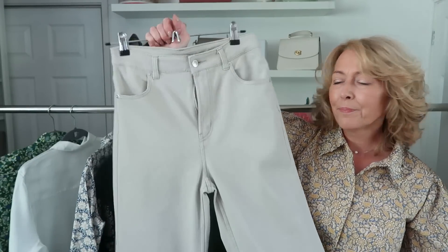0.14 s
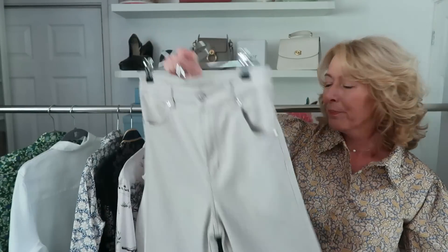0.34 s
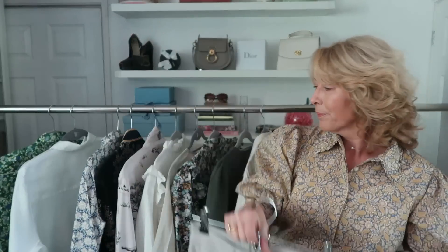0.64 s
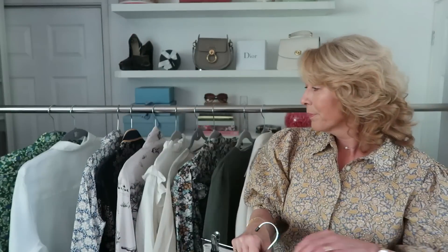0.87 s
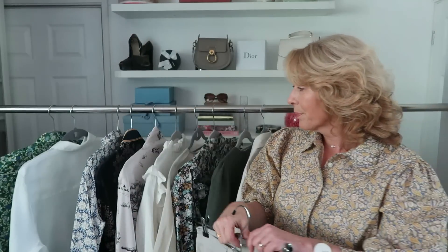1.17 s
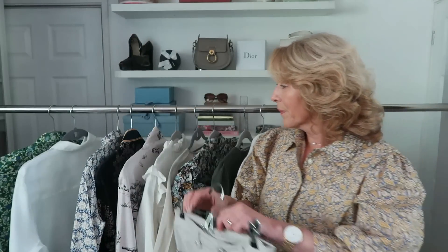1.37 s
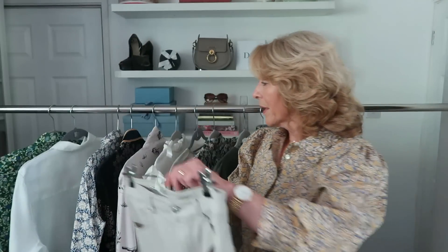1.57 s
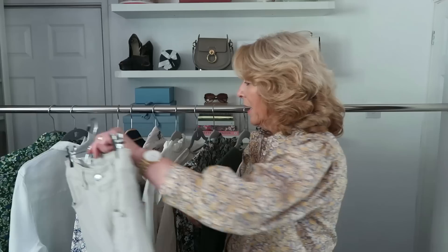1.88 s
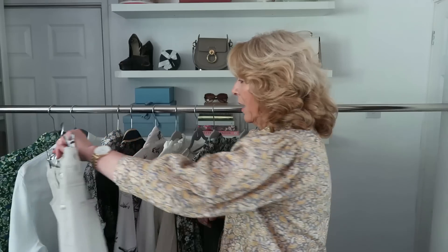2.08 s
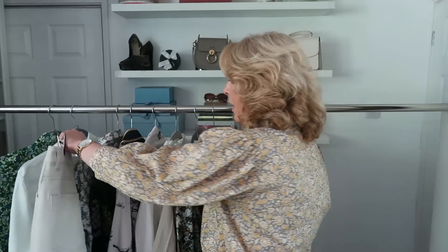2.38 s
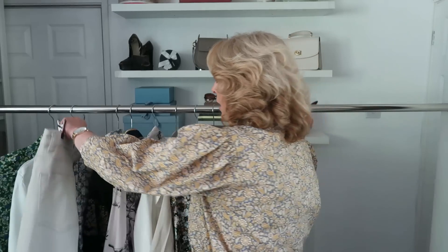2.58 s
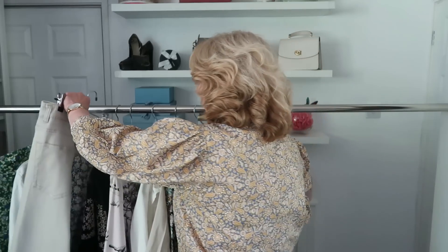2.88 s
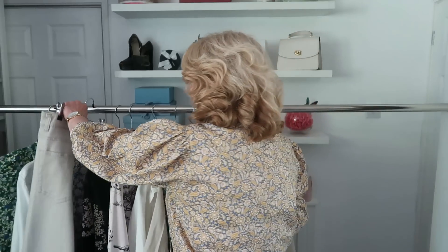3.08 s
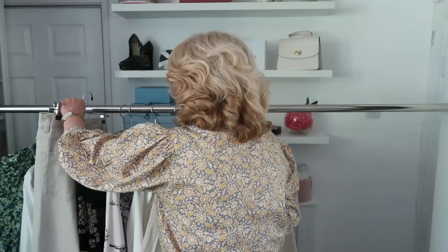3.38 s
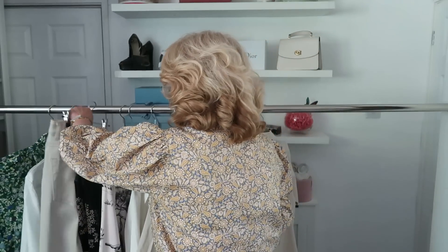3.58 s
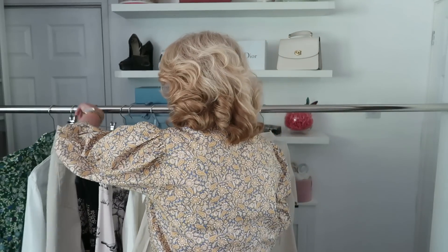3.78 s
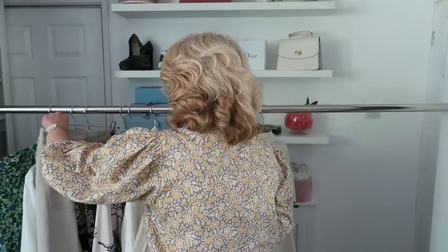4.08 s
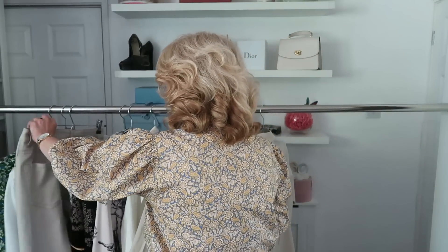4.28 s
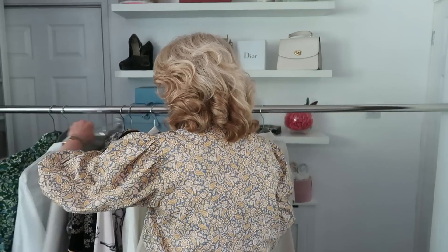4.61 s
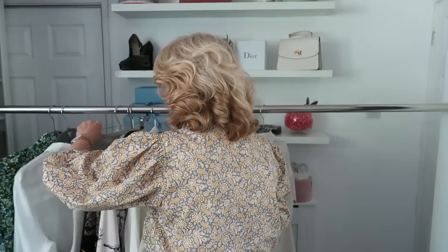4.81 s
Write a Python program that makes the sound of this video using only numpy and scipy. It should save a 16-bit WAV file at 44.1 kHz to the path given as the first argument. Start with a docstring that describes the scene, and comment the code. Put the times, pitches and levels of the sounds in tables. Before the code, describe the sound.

A small, fairly dry room with soft steady air noise, a faint low hum and a barely perceptible high whine, heard by a close stereo pair. From 0.4 s a floorboard gives quiet, short hollow creaks, recurring until about 2.2 s. A dull, muffled thud lands at 0.9 s, and a firmer woody knock at 1.36 s. A sharp clip snap at 1.57 s leads into quick lighter clicks until 1.75 s, with a brief rustle of cloth around 1.7 s. Low bumps and a click come at 2.3-2.5 s. At 2.87 s a hook strikes the steel rail: the strongest metallic clank, briefly ringing. Small clicks follow at 3.27-3.43 s, then a brighter clink at 3.73 s, with more faint creaks from 3.2 to 3.85 s. Light ticks at 3.96, 4.12 and 4.44 s accompany faint scraping slides near 4.3, 4.63 and 4.77 s, with a click and soft thuds from 4.7 s.

```python
"""In a small quiet room a garment on a clip hanger is lowered, knocked about and hooked on a steel rail.
A floorboard creaks first, as short damped notes; then furniture thuds, as dull noise and body modes.
Clips tick as short noise bursts, and cloth rustles as clumped noise grains.
Hooks strike the rail and set its modes ringing, then slide along it as random slips; a last thud follows.
Throughout, air noise, a hum and a whine lie beneath; a close pair of microphones hears it all."""
import sys
import numpy as np
from scipy import signal
from scipy.fft import rfft, irfft
from scipy.io import wavfile
from scipy.ndimage import uniform_filter1d

SR = 44100
rng = np.random.default_rng(int(sys.argv[2]) if len(sys.argv) > 2 else 0)


def wav_out(sig):
    """Save sig, one row per channel (or a flat mono array), as 16-bit PCM at SR to the path in sys.argv[1]."""
    wavfile.write(sys.argv[1], SR, np.round(np.clip(np.atleast_2d(sig).T, -1, 1) * 32767).astype(np.int16))


def gain_from_db(level_db):
    """Turn a decibel level (scalar or array-like) into a linear amplitude factor."""
    decades = np.asarray(level_db, float) / 20
    return 10 ** decades


N = 218198  # length [samples]

# modes of hooks and hangers on the rail: (frequency [Hz], relative level [dB], t60 when struck [s])
RAIL_MODES = [(502.6, 5, 0.091), (644.5, -6.5, 0.23), (761, -8, 0.17), (821, 0.5, 0.13), (950, -6, 0.15),
              (1134, -1.5, 0.15), (1343, -2.5, 0.12), (1686, -3.5, 0.17), (1895, -5, 0.12),
              (2146.5, 2.5, 0.18), (2517, -3, 0.28), (2748, 5, 0.093), (2841, 3, 0.18), (2920, -11, 0.16),
              (3180, -19, 0.17), (3440, -2.5, .12), (4238, 7.5, 0.055), (4960, 21.5, 0.025),
              (5180, 24, 0.016), (5367, -19, 0.32), (7540, 14.5, 0.05)]
# long thin ring of the rail tube itself: (frequency [Hz], relative level [dB], t60 when struck [s])
TUBE_MODES = [(2544, -12.5, 0.54), (2583, -9, 0.59), (7200, -22, .4)]
# modes of the frame under the rail: (frequency [Hz], relative level [dB], t60 when struck [s])
FRAME_MODES = [(269, -5, 0.11), (309, 8.5, 0.075)]


def evened(x):
    """Normalisation: scales a signal to rms 1."""
    return x / np.sqrt(np.mean(x ** 2) + 1e-20)


def read(points, hz):
    """Interpolation: reads a spectrum table on a log-frequency axis."""
    f, value = np.transpose(points)
    return np.interp(np.log(hz + 1), np.log(f + 1), value)


def add(mix, s, sound):
    """Superposition: mixes a sound in at s seconds."""
    part = mix[round(s * SR):][:len(sound)]
    part += sound[:len(part)]


def band(x, lo_hz, hi_hz):
    """Filtering: passes one band of frequencies."""
    sos = signal.butter(2, [lo_hz, min(hi_hz, SR / 2.2)], "band", fs=SR, output="sos")
    return signal.sosfilt(sos, x)


def ring(modes, colour, spread_db, rise_s=0.000067):
    """Modal synthesis: a sum of dying sines; where the blow lands changes each mode's share."""
    t = np.arange(SR // 2)[:, None] / SR
    hz, db, t60 = np.transpose(modes)
    db = db + read(colour, hz) + spread_db * rng.standard_normal(len(hz))
    decay = gain_from_db(db - 60 * t / t60)
    rise = (1 - np.exp(-t / rise_s)) ** 2
    return (decay * np.sin(2 * np.pi * hz * t) * rise).sum(1)


def burst(colour, t60, size, rise_s=0.00051):
    """Filtered noise: random vibration of a given spectrum starts fast and dies exponentially."""
    spectrum = rfft(rng.standard_normal(size))
    noise = irfft(spectrum * gain_from_db(read(colour, np.fft.rfftfreq(size, 1 / SR))), size)
    t = np.arange(size) / SR
    return noise * gain_from_db(-60 * t / t60) * (1 - np.exp(-t / rise_s))


def chatter(length_s, count=8):
    """Repeated impact: a first contact and weaker bounces, as pulses of unit total energy."""
    taps = np.zeros(SR // 8)
    at = rng.random(count) * np.clip(length_s, .001, .1)
    taps[(at * SR).astype(int)] = rng.choice([-.6, .6], count) * np.exp(-at / length_s)
    taps[0] = 1
    return taps / np.linalg.norm(taps)


def strikes():
    """Impact excitation: each hook rings the rail, clatters as it settles, and sets the frame swaying."""
    # hooks striking the rail: (time [s], level [dB],
    # then colour near 900 [dB], 2700 [dB], 5000 [dB] and 12000 Hz [dB])
    blows = [(2.8744, -16, -7, -5, -22.5, -31), (3.435, -32, -3, 0.5, -3, -7),
             (3.726, -24.5, 4, 7.5, 8, -4.5)]
    clatter_db, snap_db, ring_db, sway_db = 10.5, 18.5, -5, -4
    sway_delay_s = 0.01583
    settle_s = 0.011  # before the scaling by brightness below
    clatter, ringing = np.zeros((2, N))
    for s, db, lower_mid, upper_mid, high, top in blows:
        low = -6.5 - 0.46 * upper_mid  # the brighter the blow, the less bass
        bright_part = [(2700, upper_mid), (5000, high), (7300, 0.74 * high - 3),
                       (12000, top), (16000, top + 4)]
        colour = [(500, low), (900, lower_mid), (1500, low + 2.1), (1950, low + 1.0),
                  (2140, 0.5), (2350, upper_mid - 5)] + bright_part

        crack = burst([(200, -20.5)] + colour, 0.089, size=SR // 2)
        bounces = chatter(settle_s * gain_from_db(-high / 2), count=14)  # bright blows settle sooner
        add(clatter, s, gain_from_db(db + clatter_db) * signal.fftconvolve(crack, bounces))

        # the first touch of steel on steel
        snap = burst([(1500, -37)] + bright_part, 0.015, size=SR // 10, rise_s=0.0012)
        add(clatter, s, gain_from_db(db + snap_db) * snap)

        add(ringing, s, gain_from_db(db + ring_db) * ring(RAIL_MODES, colour, 0.42, 0.0022))
        tube = ring(TUBE_MODES, [(300, 0)], 0.59, 0.0046)
        # the tube follows the brightness of a blow in part
        add(ringing, s, gain_from_db(db + ring_db + 0.8 * upper_mid) * tube)
        frame = ring(FRAME_MODES, [(300, 0)], 0.28, 0.0052)
        add(ringing, s + sway_delay_s, gain_from_db(db + lower_mid + sway_db) * frame)
    return clatter, ringing


def slides():
    """Stick-slip friction: uneven slips of the hook hiss and feed damped rail modes."""
    # hooks dragged along the rail: (time of most pressure [s], build-up [s], level [dB],
    # squeal frequency [Hz], squeal [dB], treble [dB])
    drags = [(4.31, .13, -54, 1144, 5, -3.5), (4.631, .04, -51, 1420, 1.5, -1.5),
             (4.77, 0.087, -45.5, 1090, -10, -3)]
    rise_db, fall_db_per_s, tail_s = 7, 153, 0.22
    slips_per_s = 3000
    out = np.zeros(N)
    for s, rise_s, peak_db, squeal_hz, squeal_db, treble_db in drags:
        t = np.arange(-rise_s, tail_s, 1 / SR)
        db = peak_db + np.minimum(rise_db * t / rise_s, -fall_db_per_s * t)
        size, chance, sign = rng.random((3, SR // 2))[:, :len(t)]
        grip = evened(uniform_filter1d(size - .5, size=500))  # the hook catches and lets go
        db = db + 2.0 * grip

        size_db = 4 * np.minimum(-np.log(1 - size), 3.5)
        slips = (2 * sign - 1) * gain_from_db(size_db) * (chance < slips_per_s / SR)
        # contact with the hook halves the decay times
        damped = [(hz, level, 0.5 * t60) for hz, level, t60 in RAIL_MODES + TUBE_MODES + FRAME_MODES]
        resonance = signal.fftconvolve(slips, ring(damped, [(300, 0)], 0.8))[:len(t)]
        raw = evened(resonance) + 0.96 * evened(slips)

        # the squeal grows faster than the hiss as pressure rises
        squeal_db = squeal_db + 0.9 * (db - peak_db)
        parts = [(0, 2000, 3100), (squeal_db - 1.0, 240, 360),
                 (squeal_db, squeal_hz / 1.18, squeal_hz * 1.024), (treble_db, 3800, 11000)]
        sound = sum(gain_from_db(db + g) * evened(band(raw, lo, hi)) for g, lo, hi in parts)
        add(out, s - rise_s, sound * signal.windows.tukey(len(t), .1))
    return out


def thuds():
    """Soft impact: a long contact excites the low modes of a hollow wooden body, with a dull puff."""
    # dull knocks on furniture: (time [s], level [dB], brightness [dB], length of contact [s])
    knocks = [(0.897, -30, -28.5, 0.034), (0.925, -45, -11.5, 0.026), (1.358, -22, -23, 0.0075),
              (1.573, -35.5, -13, 0.0075), (2.339, -41, -22, 0.014), (2.4153, -29.5, -27, 0.0054),
              (2.455, -40.5, -20.5, 0.0092), (4.732, -41, -22.5, 0.012), (4.926, -46, -41, 0.0062)]
    # modes of the wooden body: (frequency [Hz], relative level [dB], t60 [s])
    body_modes = [(61.5, -13, 0.38), (110, -19, 0.058), (146, 6, 0.094), (227.8, -13.5, 0.43),
                  (256.5, 7, 0.11), (314, 8, 0.063), (439, 5, 0.067), (567, 4, 0.091), (721, -8, 0.34),
                  (775, -4, 0.17), (918, 1, 0.095)]
    out = np.zeros(N)
    for s, db, bright, length_s in knocks:
        puff_colour = [(35, -38), (90, -21), (150, -4), (200, -19), (400, -5.5),
                       (800, bright + 10), (3000, bright - 15), (6000, -72)]
        puff = burst(puff_colour, 0.17, size=SR // 2)
        puff = signal.fftconvolve(puff, chatter(length_s))[:len(puff)]
        puff *= 1 - np.exp(-np.arange(len(puff)) / SR / (0.46 * length_s))
        body = ring(body_modes, [(350, 0), (700, bright + 12)], 0.95, length_s / 4)
        add(out, s, gain_from_db(db) * (body + gain_from_db(20) * puff))
    return band(out, 75, 9000)


def ticks():
    """Light impact: brief contact gives short broad snaps with a treble edge."""
    # clips and lightly touching hooks: (time [s], level [dB], centre frequency [Hz], treble [dB])
    snaps = [(1.042, -37, 2800, -8), (1.357, -28.5, 1300, -40), (1.5734, -15.5, 1240, -11),
             (1.6799, -24, 2180, -16), (1.7185, -32, 2270, -4.5), (1.7442, -28.5, 1780, -5),
             (1.995, -40, 2190, -25), (2.4872, -22.5, 1110, -19.5), (2.814, -28.5, 2780, -8.5),
             (3.2717, -25.5, 1240, -65), (3.3657, -21, 3080, -23), (3.427, -22.5, 2450, -4),
             (3.9608, -26, 1060, -11.5), (4.1177, -26.5, 2100, -24), (4.436, -37.5, 3670, -31),
             (4.7154, -28.5, 2300, -2)]
    out = np.zeros(N)
    for s, db, hz, treble in snaps:
        colour = [(hz / 4, -14), (hz, 0), (hz * 2, -7),
                  (8500, treble - 4), (13000, treble - 6), (16000, treble - 25)]
        rise_s = 0.0012 * gain_from_db(-(db + 37) / 2)  # harder ticks start faster
        add(out, s, gain_from_db(db) * burst(colour, 0.042, size=SR // 5, rise_s=rise_s))
    return out


def rustle():
    """Friction noise: moving, rubbing fabric makes fine random grains that come in clumps."""
    # cloth moving and rubbing: (time [s], level [dB])
    motion = [(0.0, -80), (0.87, -60), (1.28, -68.5), (1.66, -58.5), (1.69, -49.5), (1.76, -51),
              (1.84, -59.5), (3.79, -58.5), (4.95, -60.5)]
    s, db = np.transpose(motion)
    clumps = evened(uniform_filter1d(rng.standard_normal(N), 900))
    grains = rng.standard_normal(N) * gain_from_db(1.05 * clumps)
    cloth = evened(band(grains, 357, 3900)) + gain_from_db(-11.5) * evened(band(grains, 3300, 15000))
    return gain_from_db(np.interp(np.arange(N) / SR, s, db)) * cloth


def creak_note(hz):
    """Damped resonance: one slip of wood sounds a short hollow note of peak 1."""
    t60_s, rise_s = 0.084, 0.0023
    t = np.arange(SR // 10) / SR
    note = np.sin(2 * np.pi * hz * t) * gain_from_db(-60 * t / t60_s) * (1 - np.exp(-t / rise_s))
    return note / abs(note).max()


def creak():
    """Stick-slip in a loaded floorboard: clear creaks over uneven faint slips of differing pitch."""
    # the clearest creaks under shifting weight: (time [s], level [dB], pitch [Hz])
    clear_creaks = [(0.407, -43, 422), (0.453, -44.5, 377), (0.551, -49.5, 405), (0.645, -46.5, 423),
                    (0.711, -59, 388), (0.811, -55, 390), (1.077, -47, 382), (1.179, -42, 388),
                    (1.266, -48.5, 390), (1.317, -57, 446), (1.808, -47.5, 412), (1.914, -44, 384),
                    (1.948, -54, 387), (2.009, -46, 394), (2.05, -59.5, 430), (2.114, -48, 385),
                    (2.149, -45.5, 385), (2.181, -48, 380), (2.222, -47, 382), (3.18, -46, 350),
                    (3.251, -52, 414), (3.579, -48.5, 365), (3.661, -49, 375), (3.845, -43, 387)]
    # fainter creaks while the board is loaded: (start [s], end [s], level [dB])
    loaded = [(0.4, 2.66, -62.5), (3.17, 3.95, -57)]
    centre_hz, slips_per_s = 396.7, 52
    t, out = np.arange(N) / SR, np.zeros(N)
    for pitch in np.linspace(.93, 1.1, num=6):
        slips = gain_from_db(2.0 * rng.exponential(1, N)) * (rng.random(N) < slips_per_s / 6 / SR)
        out += signal.oaconvolve(slips, creak_note(centre_hz * pitch))[:N]
    out = evened(out) * sum(gain_from_db(db) * (t > start) * (t < end) for start, end, db in loaded)
    for s, db, hz in clear_creaks:
        add(out, s, gain_from_db(db) * creak_note(hz))
    return out


def room_tone():
    """Stationary noise: shaped air noise with faint patches, a hum and a whine."""
    # noise alike in both microphones: (frequency [Hz], relative density [dB])
    air = [(12, -23), (20, -11.5), (70, 2.5), (255, -2.5), (357, -3), (527, -7.5), (1060, -8.5),
           (3440, -19), (7520, -26), (12100, -36), (13200, -34.5), (14300, -49), (16000, -67)]
    # noise opposite in the two microphones: (frequency [Hz], relative density [dB])
    hiss = [(12, -69), (20, -32), (113, -12), (210, -2), (446, -2.5), (624, -6), (5230, -18),
            (12100, -31.5), (13900, -36), (16000, -67)]
    # a low hum and a thin whine: (frequency [Hz], rms level [dB])
    tones = [(59.2, -67), (13006, -84.5)]
    air_db, hiss_db = -54, -57  # rms
    frames, hz = N // 256 + 5, np.fft.rfftfreq(1024, 1 / SR)
    a, b, c, d, patches = rng.standard_normal((frames, 513, 5)).T
    # level patches [dB], smooth over frequency and then over time
    patches = uniform_filter1d(uniform_filter1d(patches, 10, 0), 14, 1)
    patches = 2.6 * evened(patches)
    air_bins = (a + 1j * b) * gain_from_db(read(air, hz)[:, None] + patches)
    hiss_bins = (c + 1j * d) * gain_from_db(read(hiss, hz))[:, None]
    mid, side = signal.istft(np.array([air_bins, hiss_bins]), nperseg=1024, noverlap=768)[1][:, :N]
    mid, side = gain_from_db(air_db) * evened(mid), gain_from_db(hiss_db) * evened(side)
    for hz, db in tones:
        wander = np.cumsum(rng.standard_normal(N)) * 0.0036  # phase [rad]
        mid += gain_from_db(db) * np.sqrt(2) * np.sin(2 * np.pi * hz * np.arange(N) / SR + wander)
    return np.array([mid + side, mid - side])


def pair(x, wet_db):
    """Reverberation: direct sound plus echoes, each from its own side, into two microphones."""
    # decay of the room: (frequency [Hz], t60 [s])
    room_decay = [(100, 0.24), (300, 0.34), (1000, 0.24), (3000, 0.19), (8000, 0.18), (14000, 0.012)]
    # phase difference of the two microphones, growing in the treble: (frequency [Hz], phase [rad])
    mic_phase = [(3000, 0.028), (5500, 1.3), (8000, 2.18), (12000, 2.5)]
    taps = np.zeros((2, SR // 2))
    at = np.arange(150, SR // 2 - 40, 20)
    at = at + rng.integers(0, 20, len(at))
    sign, lag = rng.choice([-1., 1.], len(at)), rng.integers(-1, 2, len(at))
    np.add.at(taps[0], at - lag, sign)
    np.add.at(taps[1], at + lag, sign)

    # every frequency dies at its own rate
    hz, t, z = signal.stft(taps, SR, nperseg=256)
    tail = signal.istft(z * gain_from_db(-60 * t / read(room_decay, hz)[:, None]), SR, nperseg=256)[1]
    response = gain_from_db(wet_db) * tail / np.linalg.norm(tail[0])
    response[:, 0] += 1  # direct sound
    heard = signal.fftconvolve(x[None], response, axes=1)[:, :N]
    turn = np.exp(.5j * read(mic_phase, np.fft.rfftfreq(N, 1 / SR)))
    return irfft(rfft(heard) * [turn, turn.conj()], N)


def scene():
    """Superposition: every source with its own balance of direct sound and echoes, over the room tone."""
    clatter, ringing = strikes()
    rail = pair(clatter + slides(), -6.5) + pair(ringing, -5.5)
    hands = pair(thuds(), -10.0) + pair(ticks() + rustle(), -5.5) + pair(creak(), -9.5)
    return rail + hands + room_tone()


def band_limit(x):
    """A steep low-pass at the top of the band."""
    return signal.sosfilt(signal.butter(12, 16500, fs=SR, output="sos"), x)


def record(dry):
    """Transmission: passes the finished mix to the output."""
    return band_limit(dry)


dry = scene()
out = record(dry)
wav_out(out)
```